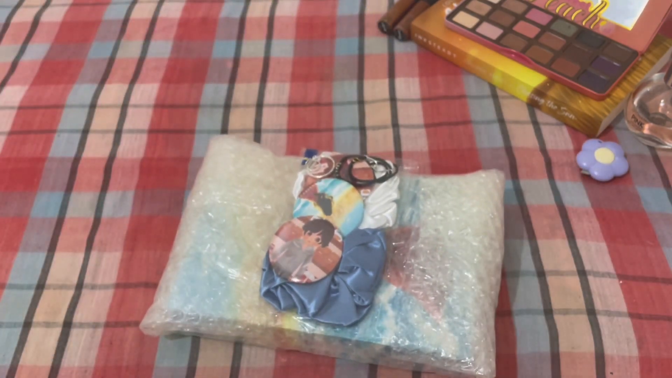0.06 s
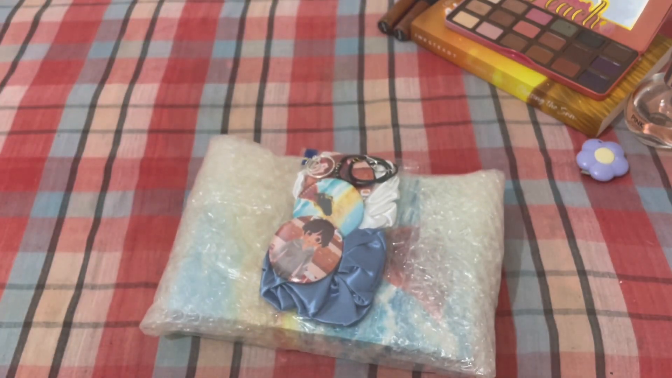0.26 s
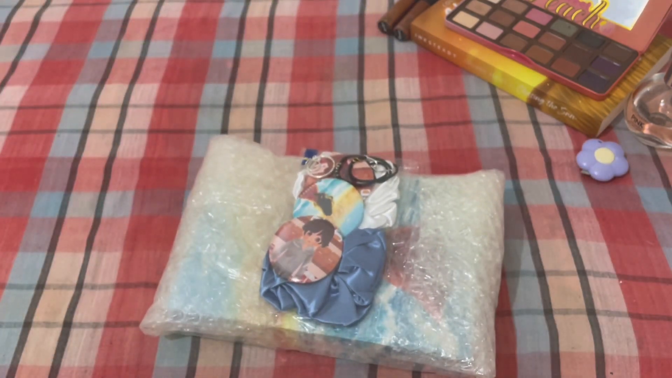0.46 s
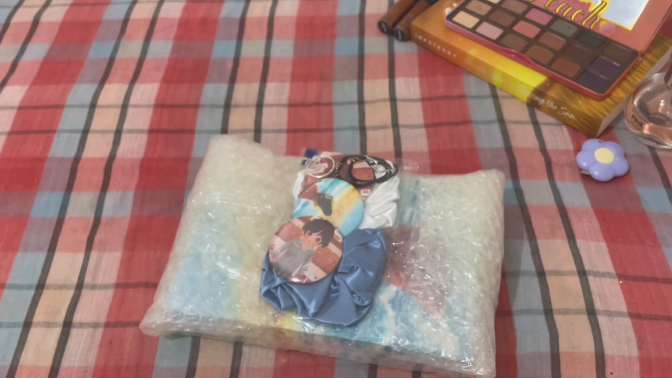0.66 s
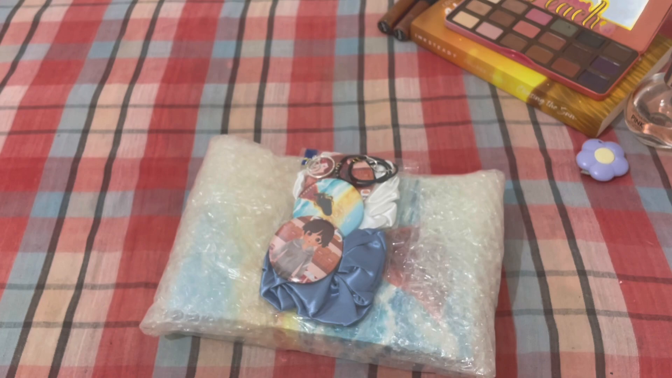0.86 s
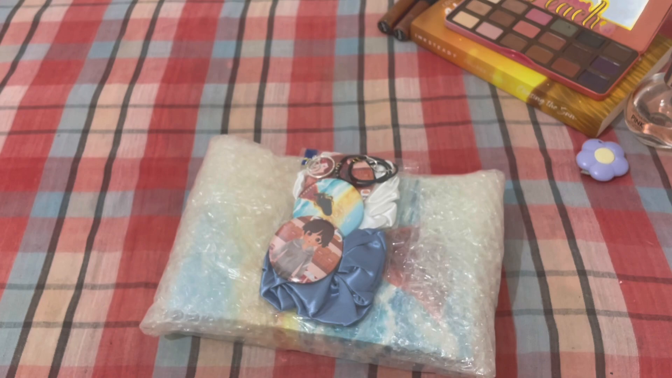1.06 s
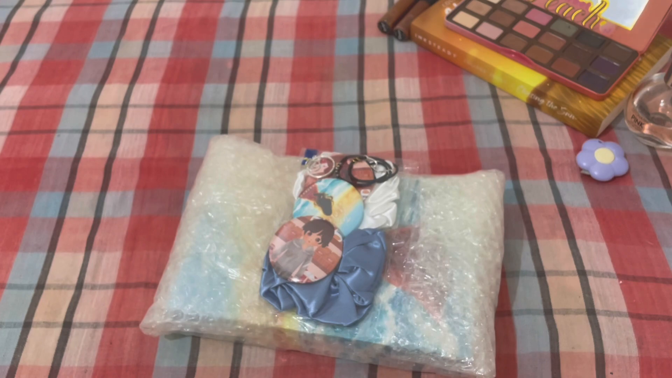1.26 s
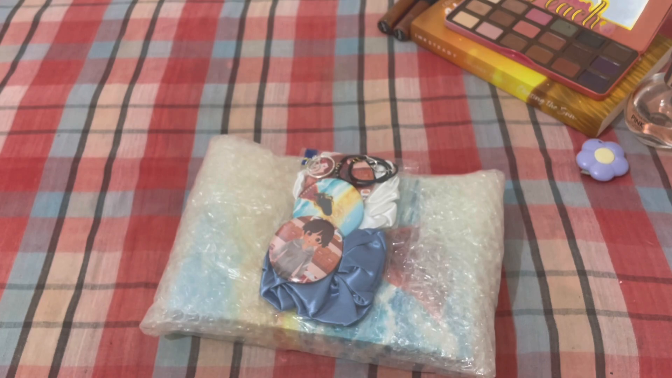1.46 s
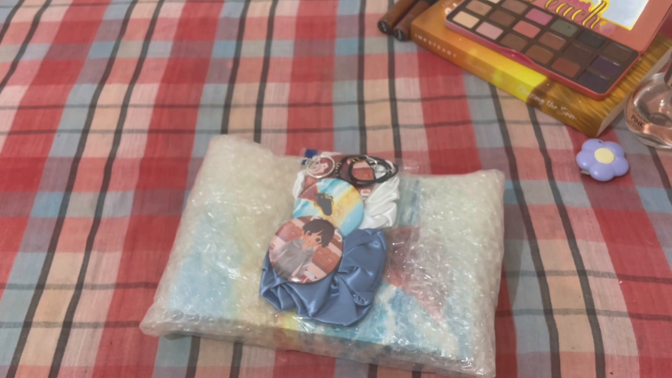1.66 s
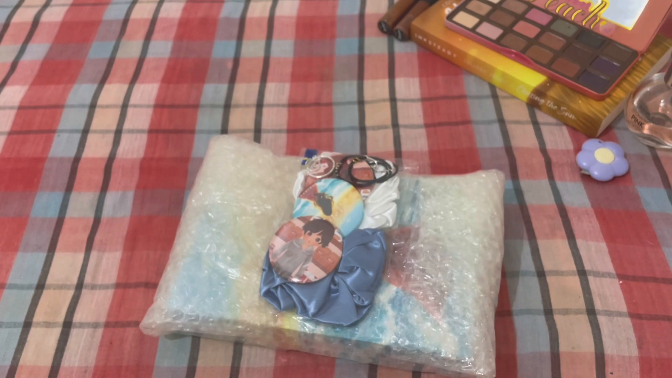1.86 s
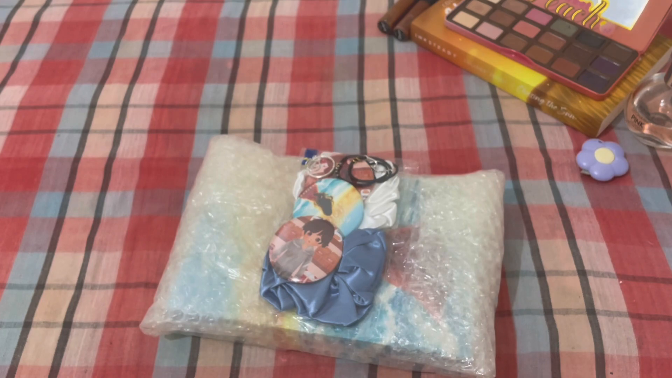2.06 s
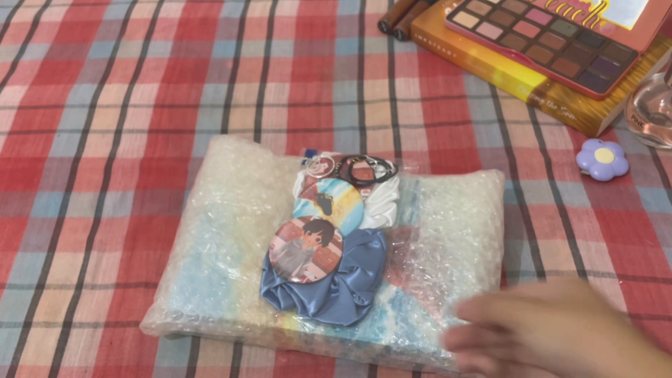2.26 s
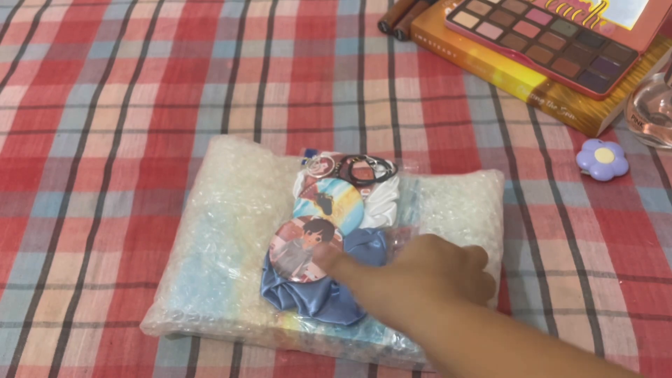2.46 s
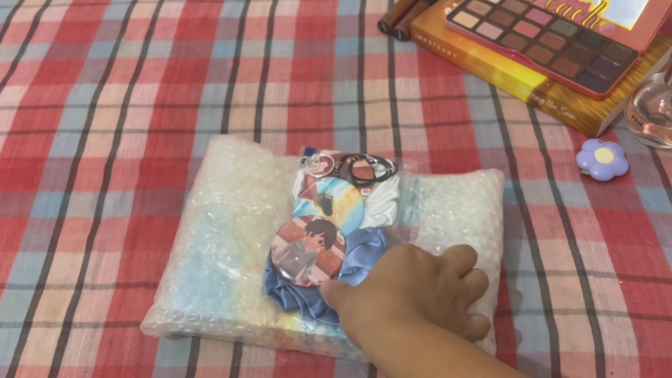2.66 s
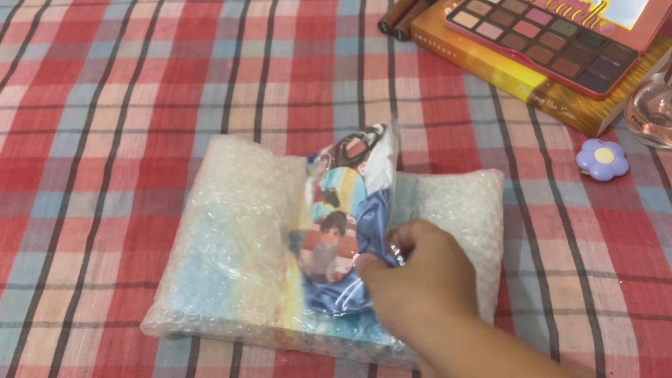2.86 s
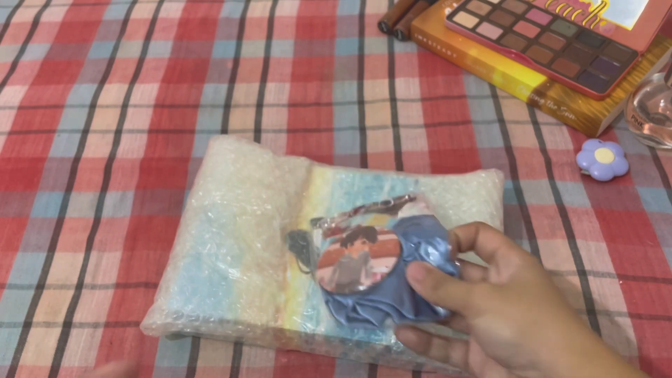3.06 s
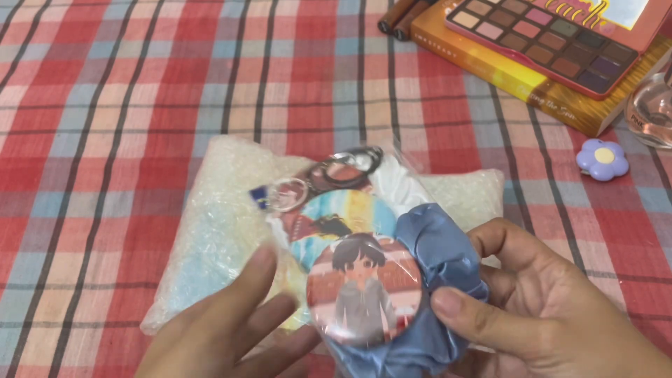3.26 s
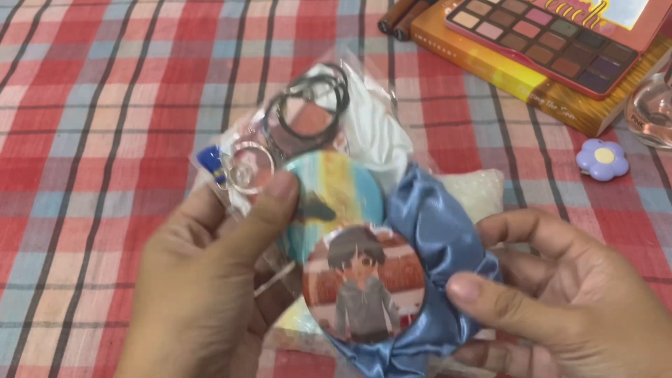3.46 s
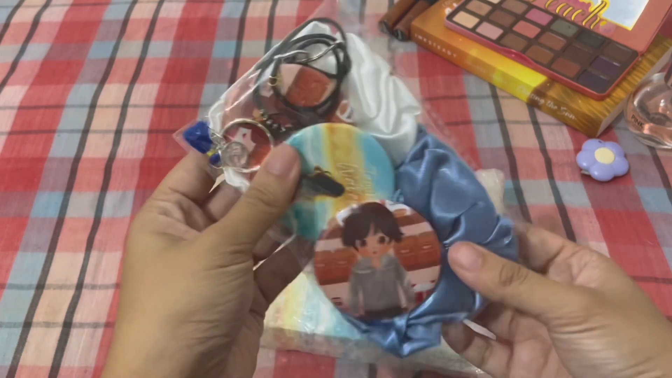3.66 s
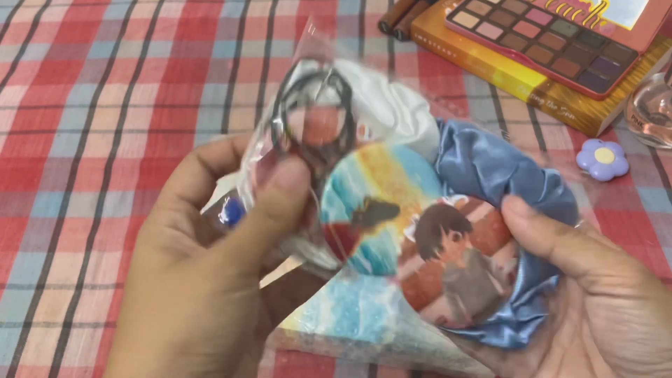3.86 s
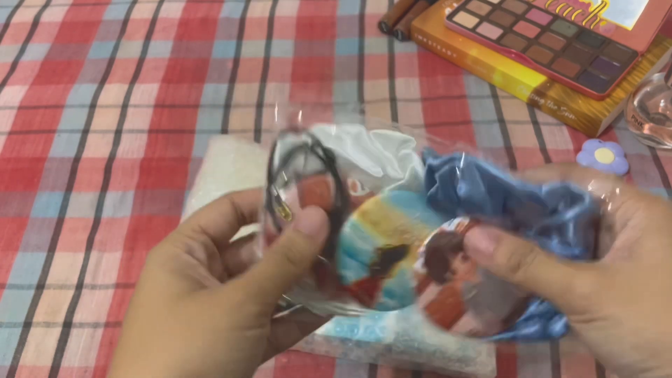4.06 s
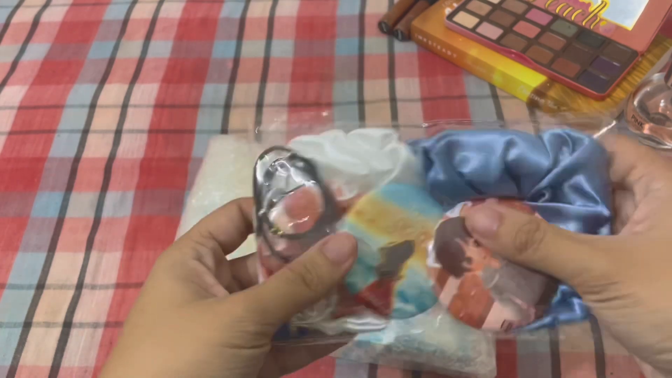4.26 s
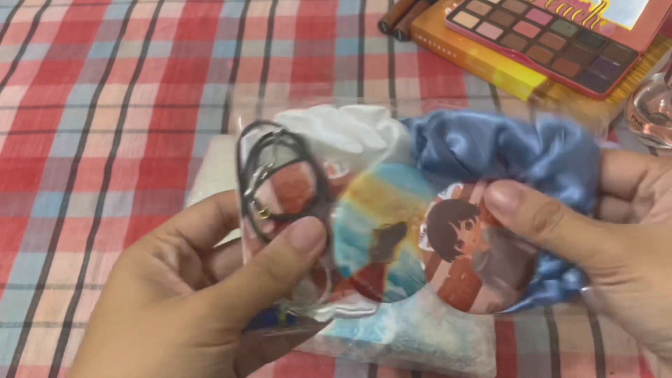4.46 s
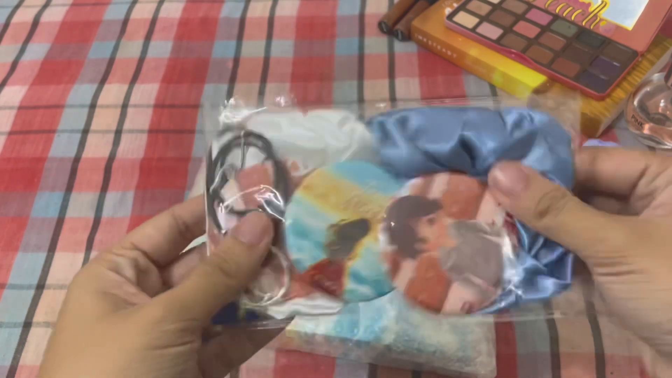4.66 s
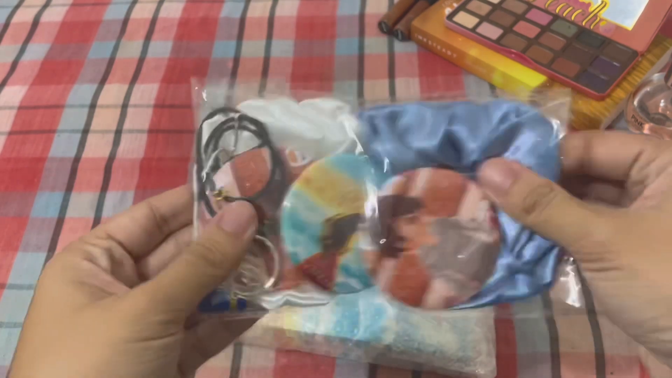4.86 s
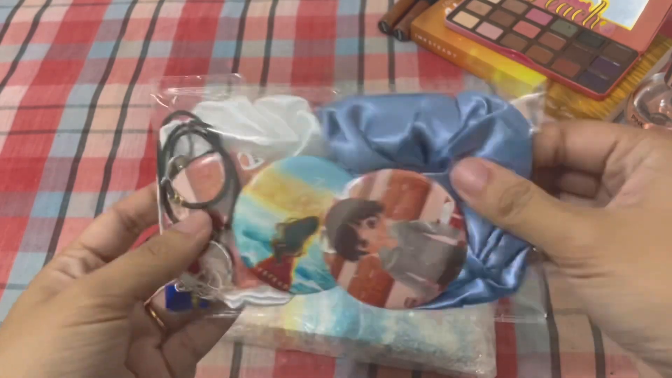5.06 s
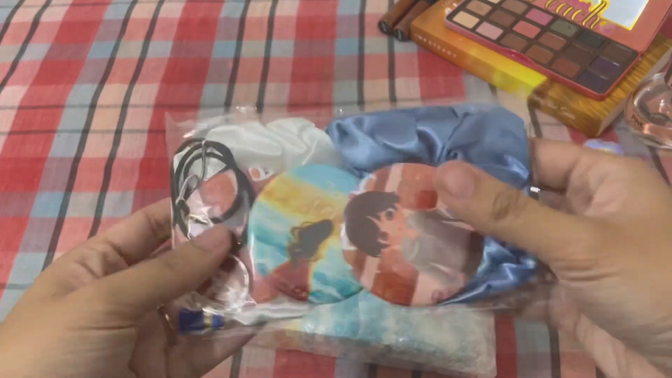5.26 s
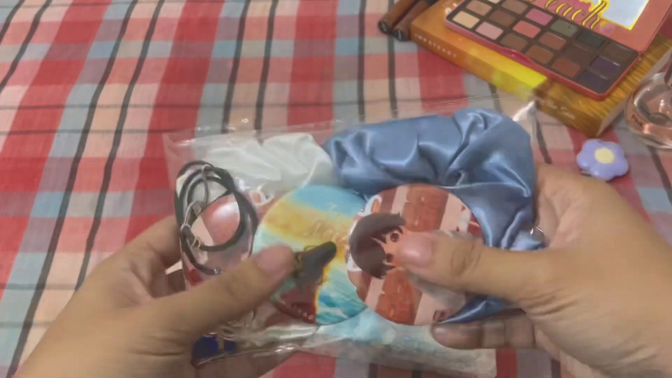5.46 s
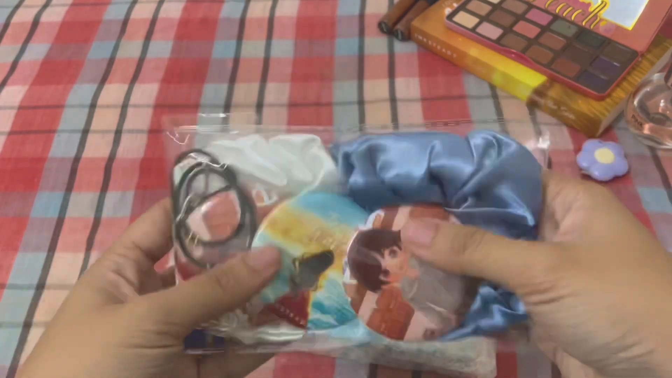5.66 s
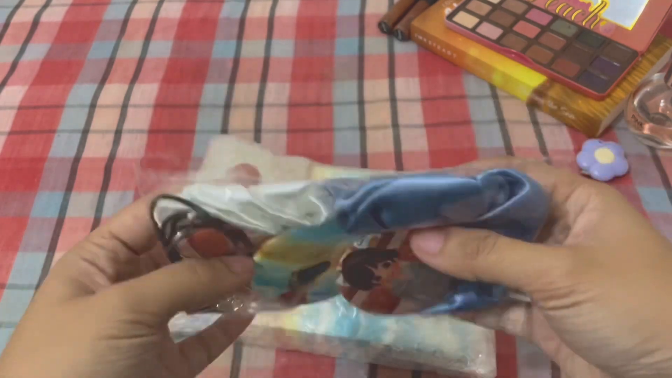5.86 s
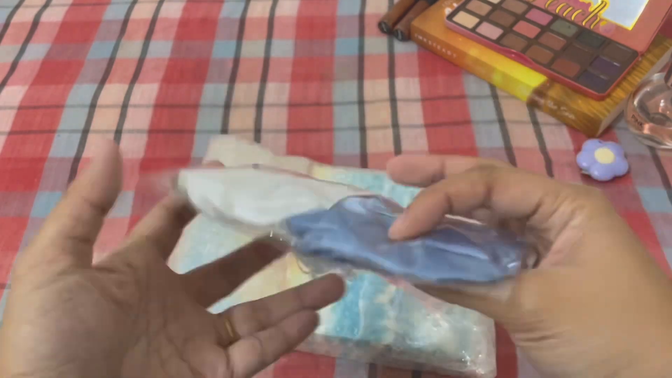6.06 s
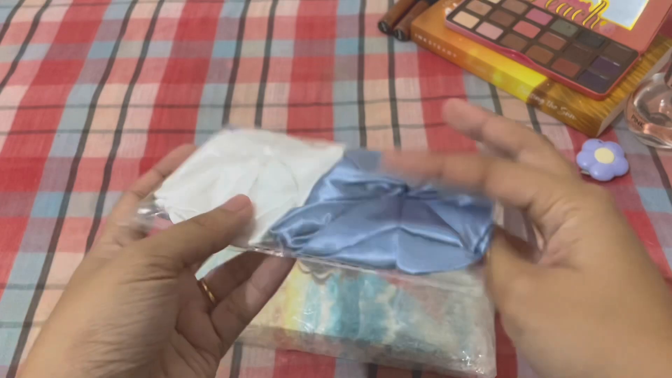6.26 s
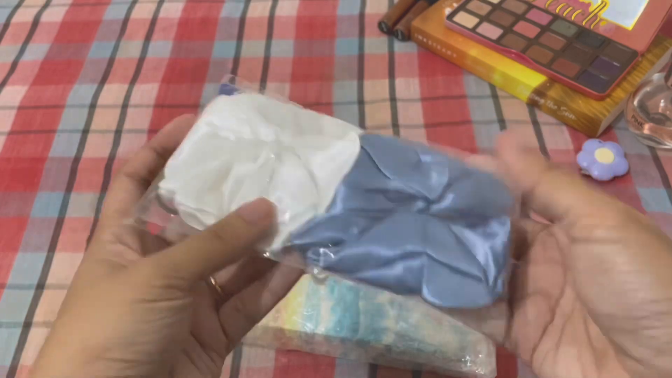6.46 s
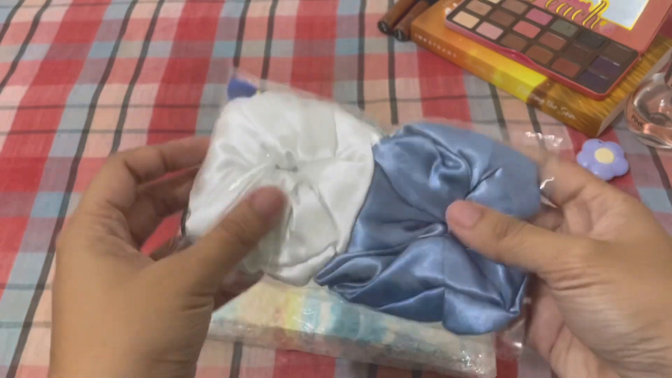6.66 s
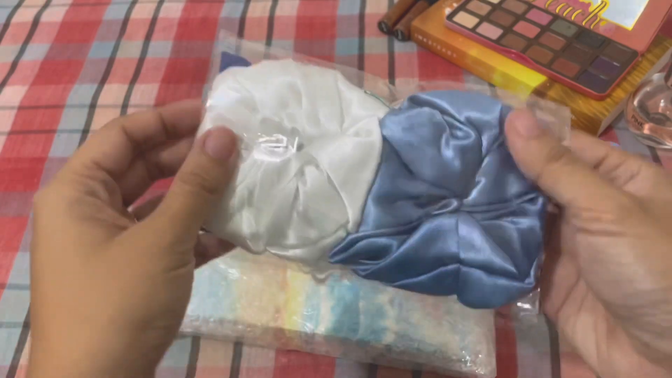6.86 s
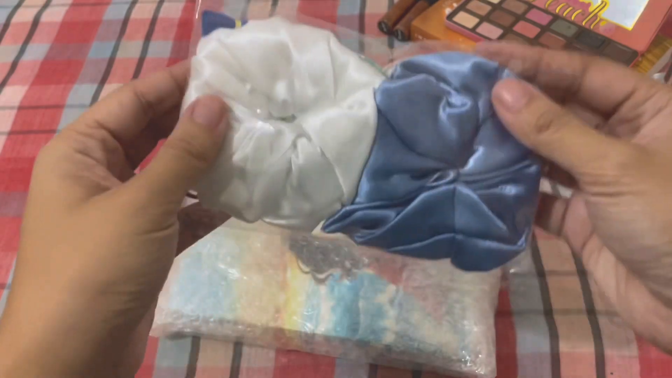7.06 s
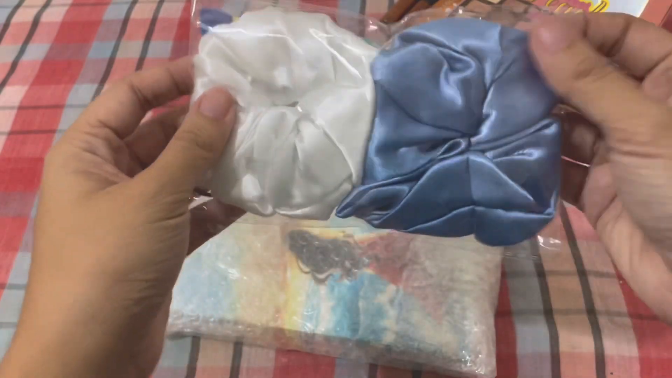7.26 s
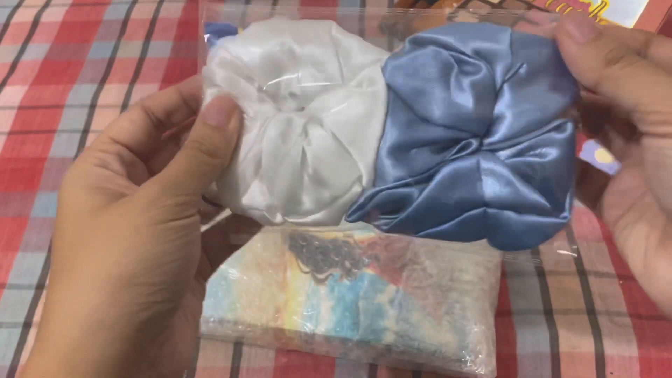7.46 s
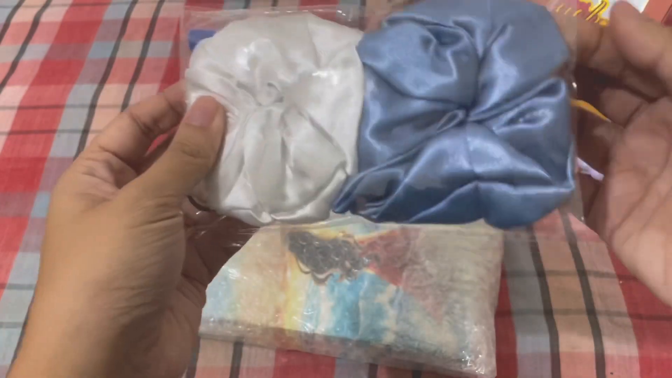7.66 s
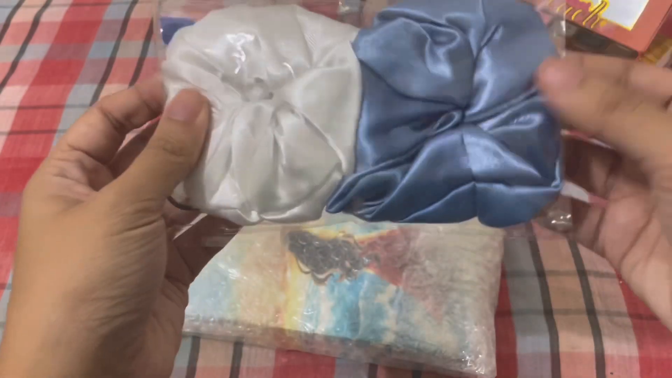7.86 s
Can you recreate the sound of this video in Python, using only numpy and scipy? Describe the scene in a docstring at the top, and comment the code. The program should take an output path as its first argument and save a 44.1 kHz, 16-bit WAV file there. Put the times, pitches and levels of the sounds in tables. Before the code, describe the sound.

Two dull table knocks and a faint rustle, then hands crinkle a clear plastic bag with sharp ticks, crackles and a late soft thump.

```python
"""A small room with a low rush of air: hands work a clear plastic bag over a cloth-covered table, close to a phone.
They pick the bag of hair ties and badges from a bubble-wrap parcel and turn it over, after a faint rustle.
Each flex sets off creases that tick and ring the panel beside them; folds cave in as runs of ringing panels.
The film slides and hisses as shaped noise. Dull knocks and bumps are decaying low modes with noise bursts;
a dragging arm is low rumble. Direct sound reaches two ports, and noise tails add the room."""
import sys
import numpy as np
from scipy import signal
from scipy.fft import rfft, irfft, next_fast_len
from scipy.io import wavfile

SR = 44100
rng = np.random.default_rng(int(sys.argv[2]) if len(sys.argv) > 2 else 0)


def master(y):
    """Save y as 16-bit WAV."""
    cut = np.clip(np.atleast_2d(y).T, -1, 1)
    pcm = np.round(cut * 32767)  # scale
    wavfile.write(sys.argv[1], SR, pcm.astype(np.int16))


N = 348831


def undb(db):
    """Decibels to amplitude gain."""
    return 10 ** (np.asarray(db) / 20)


def unit(x):
    """Scale each row to energy 1."""
    return x / np.sqrt(np.sum(x ** 2, axis=-1, keepdims=True))


def curve(rows):
    """Interpolate each table column over time; the first column is time_s."""
    time_s, *columns = np.transpose(rows)
    return [np.interp(np.arange(N) / SR, time_s, column) for column in columns]


def colour(x, points):
    """Minimum-phase filter through (hz, db) points: causal, so attacks stay sharp."""
    n = next_fast_len(x.shape[-1], True)
    n += n % 2
    hz, db = np.transpose(points)
    log_hz = np.log(np.fft.rfftfreq(n, 1 / SR) + 1)
    cepstrum = irfft(np.log(undb(np.interp(log_hz, np.log(hz), db))))
    # fold the cepstrum onto positive time
    cepstrum[1:n // 2] *= 2
    cepstrum[n // 2 + 1:] = 0
    response = np.exp(rfft(cepstrum))
    return irfft(rfft(x, n) * response)[..., :x.shape[-1]]


def noise(points):
    """Coloured noise of rms 1."""
    return unit(colour(rng.standard_normal(N), points)) * np.sqrt(N)


def walk(points_per_s):
    """Straight lines between random points: a wander of rms about 1.2."""
    return 1.48 * np.interp(np.arange(N) / SR * points_per_s, np.arange(N), rng.standard_normal(N))


def around(x, hz, ratio, order):
    """Band-pass from hz / ratio to hz * ratio."""
    band = signal.butter(order, [hz / ratio, hz * ratio], "band", fs=SR, output="sos")
    return signal.sosfilt(band, x)


def add(out, start_s, sound):
    """Mix a sound into a track at start_s."""
    i = max(int(start_s * SR), 0)
    out[..., i:i + sound.shape[-1]] += sound[..., :max(N - i, 0)]


def effort(rows, attack_s, release_s):
    """Strength of strokes (start_s, length_s, *level_db): each builds, holds and dies exponentially."""
    t = np.arange(N) / SR
    strength = 0
    for start_s, length_s, *level_db in rows:
        before = np.maximum(start_s - t, 0) / attack_s
        after = np.maximum(t - start_s - length_s, 0) / release_s
        stroke = np.exp(-np.minimum(before + after, 20))
        strength = np.maximum(strength, undb(level_db)[:, None] * stroke)
    return strength


# microphone ports, phase: hz, left_lead_rad
PORT_PHASE_POINTS = [(0, 0), (60, -.28), (200, -.42), (450, .4), (1000, .05), (2800, .35), (4000, .1),
                     (6000, -.1), (7000, -1.4), (8200, -3.1), (8900, -3.5), (10900, -5.8), (12400, -6.5),
                     (14300, -9.1), (16000, -9.6)]
# microphone ports, balance: hz, left_minus_right_db
PORT_BALANCE_POINTS = [(500, -1.5), (1400, 0), (2600, 2.5), (5000, 0.4), (7500, 0.5)]


def ports(x):
    """Direct sound reaches the two ports with frequency-dependent phase and level differences."""
    n = next_fast_len(N, True)
    hz = np.fft.rfftfreq(n, 1 / SR)
    balance_db = np.interp(hz, *np.transpose(PORT_BALANCE_POINTS))
    lead_rad = np.interp(hz, *np.transpose(PORT_PHASE_POINTS))
    half = undb(balance_db / 2) * np.exp(.5j * lead_rad)  # half of each difference per side
    return irfft(rfft(x, n) * np.array([half, 1 / half]), n)[:, :N]


def room(x, t60_s=.33, rise_s=0.00066, level_db=-9.5):
    """Short, dullish reverberation: a decaying noise tail of its own at each port."""
    t = np.arange(SR // 2) / SR
    shape = np.exp(-np.log(1000) * t / t60_s) * (1 - np.exp(-t / rise_s))
    tails = unit(rng.standard_normal((2, len(t))) * shape)
    tails = colour(tails, [(60, -14), (130, -6), (300, 3), (1500, 0), (5000, -2), (15000, -4)])
    return undb(level_db) * signal.fftconvolve(x, tails, axes=1)[:, :N]


# room air spectrum: hz, relative_db_per_hz
AIR_SPECTRUM = [(15, -61), (25, -9), (53, 1.5), (87, -1), (120, -0.5), (200, -11.5), (400, -12.5),
                (500, -11.5), (620, -13), (960, -14.5), (1400, -19.5), (1850, -19), (2150, -13),
                (2500, -18.5), (3400, -27), (7000, -35), (12500, -38), (16000, -63)]
# room air strength: time_s, level_db
AIR_LEVELS = [(0, -58), (.6, -57), (1.2, -54), (2.3, -54.5), (7.9, -55.5)]


def air(side_db=-8, side_hz=150):
    """Low rush of air: slowly drifting noise, with opposite-sign noise widening it above side_hz."""
    level_db, = curve(AIR_LEVELS)
    high_pass = signal.butter(1, side_hz, "high", fs=SR, output="sos")
    side = undb(side_db) * signal.sosfilt(high_pass, noise(AIR_SPECTRUM))
    return undb(level_db) * (ports(noise(AIR_SPECTRUM)) + np.array([side, -side]))


# faint rustle, mean strength: time_s, level_db
RUSTLE_LEVELS = [(1.09, -64), (1.145, -50.5), (1.3, -63), (1.48, -66), (1.545, -54), (1.6, -63),
                 (1.655, -53.5), (1.85, -84)]


def rustle(uneven_db=2, points_per_s=29.95):
    """A faint, dull rustle of movement: noise of wandering level."""
    level_db, = curve(RUSTLE_LEVELS)
    cloth = noise([(150, 11.5), (700, 5), (1600, -4.5), (5000, -17.5), (15000, -49)])
    return undb(level_db + uneven_db * walk(points_per_s)) * cloth


# arm dragging over the cloth: start_s, length_s, level_db
ARM_DRAGS = [(4.19, 0.23, -43), (7.01, 0.19, -29.5)]
# table rumble under the arm: hz, relative_db_per_hz
DRAG_SPECTRUM = [(30, -2), (60, 9), (100, -1), (200, -11.5), (320, -18), (500, -54), (1500, -69)]


def drags():
    """The table rumbles while an arm slides on it."""
    push, = effort(ARM_DRAGS, attack_s=0.02, release_s=0.051)
    return push * noise(DRAG_SPECTRUM)


# soft bumps of hands and arms: start_s, level_db (rms over 1/30 s), pitch_hz
SOFT_BUMPS = [(2.63, -49, 73.4), (3.236, -40.5, 92), (4.18, -49, 79), (4.206, -32, 95), (4.252, -35, 61),
              (4.36, -48, 104), (7.004, -32, 87), (7.086, -33, 162), (7.125, -29, 190),
              (7.129, -24.5, 77.5), (7.158, -40.5, 189), (7.204, -32, 61.6)]


def bumps(cycles=0.45, scuff_db=-7, scuff_s=0.018, width_ratio=1.46):
    """A soft push gives the table a heavily damped swing, with a dull scuff of cloth."""
    t = np.arange(SR // 4) / SR
    out = np.zeros(N)
    for start_s, level_db, pitch_hz in SOFT_BUMPS:
        cushion = 1 - np.exp(-2 * pitch_hz * t)
        swing = np.sin(2 * np.pi * pitch_hz * t) * np.exp(-pitch_hz * t / cycles) * cushion
        burst = rng.standard_normal(len(t)) * np.exp(-t / scuff_s)
        scuff = around(burst, 1.254 * pitch_hz, width_ratio, order=4)
        bump = unit(unit(swing) + undb(scuff_db) * unit(scuff))
        add(out, start_s, bump * undb(level_db))
    return out * np.sqrt(SR / 30)  # energy to rms over 1/30 s


# knocks: start_s, blow_db, blow_hz (band centre), rise_s (cushioning), heave_lag_s, heave_db
# (levels are rms over 1/30 s)
KNOCKS = [(0.663, -46, 450, 0.0044, 0.013, -39.5), (0.828, -30, 486, 0.0084, .02, -34.5),
          (.911, -26, 728, 0.0008, .011, -28), (3.225, -45.5, 212, 0.00085, 0.0076, -57)]
# table resonances: mode_hz, relative_db, t60_s
TABLE_MODES = [(61.5, 13.5, 0.49), (88, 22.5, 0.14), (120.2, 18, 0.25), (236, 11.5, 0.24), (288, 8.5, 0.15),
               (461.6, 1, 0.31), (571, -2.5, 0.28), (613, 13, 0.049), (644, -1.5, 0.34), (670, 12.5, 0.039),
               (800, -9.5, 0.33), (974, 6.5, 0.039), (2980, 13, 0.035)]


def table(rattle_db=-5.5, rattle_s=0.053, width_ratio=1.88, heave_hz=112):
    """Each knock rings the table and jostles what lies on it; the whole top heaves a moment later."""
    t = np.arange(SR // 2) / SR
    ring = 0
    for mode_hz, mode_db, t60_s in TABLE_MODES:
        ring = ring + undb(mode_db) * np.sin(2 * np.pi * mode_hz * t) * np.exp(-np.log(1000) * t / t60_s)
    ring = unit(ring)
    rattle_spectrum = [(30, -31.0), (80, 28.0), (750, 9.5), (1700, 7.5), (5000, 18), (15000, 15.5)]
    out = np.zeros(N)
    for start_s, blow_db, blow_hz, rise_s, lag_s, heave_db in KNOCKS:
        cushion = 1 - np.exp(-t / rise_s)
        blow, heave = (start_s, blow_db, blow_hz), (start_s + lag_s, heave_db, heave_hz)
        for when_s, level_db, centre_hz in (blow, heave):
            rattle = colour(rng.standard_normal(len(t)) * np.exp(-t / rattle_s), rattle_spectrum)
            struck = cushion * (ring + undb(rattle_db) * unit(rattle))
            knock = unit(around(struck, centre_hz, width_ratio, order=2))
            add(out, when_s, knock * undb(level_db))
    return out * np.sqrt(SR / 30)  # energy to rms over 1/30 s


def radiate(sounds, size=64):
    """Every fold faces another way: nearby film reflects it, colouring each sound and port differently."""
    fade = np.exp(-3 * np.arange(size) / size)
    shared = .65 * unit(rng.standard_normal((len(sounds), 1, size)) * fade ** 2)
    separate = .36 * unit(rng.standard_normal((len(sounds), 2, size)) * fade)
    paths = shared + separate
    paths[:, :, 0] += 1  # direct path
    return signal.fftconvolve(sounds[:, None], unit(paths), axes=2)


# crease tick, also film hiss: hz, relative_db_per_hz
TICK_SPECTRUM = [(100, -12), (480, -7), (820, -14), (1500, -7), (2900, -1), (4600, -1), (6600, 0),
                 (8000, -2), (10500, -3), (13500, -8), (16000, -10)]


def ticks(count, fast_s=0.00026, after_db=-20, crease_hz=6500, size=1024):
    """A crease flips in under a millisecond at its own pitch, trips a neighbour, and shivers briefly."""
    rise_s, neighbour_max_s, pitch_fade_s, slow_s = .00016, .004, .004, .004
    t = np.arange(size) / SR
    chance = rng.random((count, 3, 1))
    late_s = t - neighbour_max_s * chance[:, 0]
    neighbour = chance[:, 1] ** 2 * (late_s > 0) * np.exp(-np.abs(late_s) / fast_s)
    shiver = undb(after_db) * np.exp(-t / slow_s)
    shape = (1 - np.exp(-t / rise_s)) * (np.exp(-t / fast_s) + neighbour + shiver)
    pitch_hz = crease_hz * 2 ** (2 * chance[:, 2] - 1)
    pitch = np.sin(2 * np.pi * pitch_hz * t) * np.exp(-t / pitch_fade_s)
    return unit(colour((rng.standard_normal((count, size)) + .5 * pitch) * shape, TICK_SPECTRUM))


def panels(hz, cycles=2.0, spread=0.739, swell_cycles=1.0, count=12, size=1024):
    """A patch of film swells and rings for a few cycles, with new modes for every shape it takes."""
    long_share, long_cycles = .13, 17
    t = np.arange(size) / SR
    chance = rng.random((len(hz), count, 2, 1))
    ladder = 2 * (np.arange(count)[:, None] + chance[:, :, 0]) / count - 1  # -1 to 1, low to high mode
    turns = np.minimum(hz[:, None, None] * np.exp(spread * ladder), SR / 4) * t
    decay = np.exp(-turns / cycles) + long_share * np.exp(-turns / long_cycles)
    fade = (1 - np.exp(-turns / swell_cycles)) * decay
    weight = np.sign(chance[:, :, 1] - .5) * (1 - .5 * ladder ** 2)
    return unit(np.sum(weight * fade * np.sin(2 * np.pi * turns), axis=1))


# fingers first slide over the film: start_s, length_s, panel_relative_db, crease_relative_db
BRUSH_STROKES = [(2.435, 0.044, -60, -45.5)]
# bag stirring while merely held: time_s, relative_db
HOLD_LEVELS = [(2.39, -52), (2.56, -64), (2.66, -47), (3.08, -48), (3.17, -101), (3.38, -54), (3.7, -56.5),
               (4.1, -43.5), (4.8, -36.5), (4.95, -43), (5.04, -50), (5.085, -47), (5.13, -39), (5.24, -42),
               (5.3, -46), (5.37, -45), (5.9, -41.5), (6.3, -50), (6.44, -78), (6.6, -46.5), (7.4, -47.5),
               (7.5, -59), (7.7, -51.5), (7.9, -81)]
# fingers flexing the bag: start_s, length_s, panel_relative_db, crease_relative_db
FLEX_STROKES = [(2.6, 0.032, -41, -42), (2.755, 0.076, -46, -56), (2.835, 0.13, -43, -42.5),
                (2.99, 0.051, -46, -47.5), (3.402, 0.036, -31.5, -39), (3.447, 0.029, -33, -39),
                (3.513, 0.0066, -35, -36), (3.535, 0.02, -36.5, -40), (3.585, 0.045, -43, -60),
                (3.71, 0.16, -40.5, -46.5), (3.9, 0.031, -34.5, -48), (3.985, 0.23, -32.5, -34),
                (4.285, 0.026, -29, -29.5), (4.365, 0.049, -37.5, -31), (4.465, 0.047, -31.5, -29),
                (4.6, 0.029, -30, -32.5), (4.672, 0.058, -31, -30), (4.812, 0.016, -33, -32),
                (4.872, 0.052, -34.5, -30), (4.988, 0.05, -36.5, -33.5), (5.185, 0.038, -36.5, -32.5),
                (5.332, 0.064, -34.5, -36), (5.4, 0.1, -34, -36.5), (5.53, 0.051, -32, -40.5),
                (5.64, 0.17, -34.5, -40), (5.835, 0.07, -30, -30.5), (5.985, 0.095, -42.5, -39),
                (6.19, 0.051, -44, -57), (6.28, 0.088, -42, -44), (6.53, 0.076, -35, -43),
                (6.6, 0.066, -39, -49), (6.8, 0.11, -39.5, -41), (7.015, 0.08, -43.5, -42.5),
                (7.31, 0.12, -42.5, -48), (7.63, 0.031, -46.5, -36)]


def handling(catch_db=-0.8, catch_points_per_s=70):
    """Broad-panel and fine-crease strength as fingers first brush, then hold and flex film that catches."""
    hold_db, = curve(HOLD_LEVELS)
    held = undb(hold_db) * (np.arange(N) / SR > HOLD_LEVELS[0][0])
    flexed = effort(FLEX_STROKES, attack_s=0.0072, release_s=0.011)
    catching = undb(catch_db * np.tanh(walk(catch_points_per_s)))
    brushed = effort(BRUSH_STROKES, attack_s=0.021, release_s=0.074)
    return np.hypot(flexed, held) * catching, brushed


# sliding film: hz, relative_db_per_hz
RUB_SPECTRUM = [(60, -7), (150, -0.5), (340, -2), (460, 3.5), (600, -1), (780, -6.5), (1200, -5),
                (2500, -1), (4000, -8.5), (7000, -14.5), (16000, -35)]


def sliding(worked, brushed, uneven_db=3, slip_db=-10.0, hiss_db=-3.0):
    """Film slides with an uneven rub and hiss; brushing fingers add a swish."""
    rub, hiss = worked * undb(slip_db + uneven_db * walk(140)) + brushed
    slide = rub * noise(RUB_SPECTRUM) + hiss * undb(hiss_db) * noise(TICK_SPECTRUM)
    swish_spectrum = [(1000, -9), (2300, -1.5), (3000, 0), (3900, 1.5), (4800, -10), (12000, -22)]
    return slide + brushed[1] * noise(swish_spectrum)


def crackle(panel, crease, panel_hz=2100, ring_db=-11.0, tick_db=-2, count=160):
    """Many small random buckles, most of them tiny, as strong as the film is worked."""
    buckles_per_s, scatter_db, bright_range_db = 520, 7.8, 5
    ring_hz = panel_hz * np.exp(0.3045 * rng.standard_normal(count))
    rings = radiate(panels(ring_hz, cycles=2.0, spread=0.617, count=5))
    cracks = radiate(ticks(count))
    chance = rng.random((int(buckles_per_s * N / SR), 4))
    size_db = scatter_db * np.minimum(-np.log(chance[:, 1]), 2.2)
    bright_db = bright_range_db * (2 * chance[:, 2] - 1)
    ring_gain = unit(undb(size_db - bright_db)) * np.sqrt(N)
    tick_gain = unit(undb(size_db + bright_db)) * np.sqrt(N)
    low, high = np.zeros((2, 2, N))
    for (place, _, _, shape), ring, tick in zip(chance, ring_gain, tick_gain):
        when_s = place * N / SR
        add(low, when_s, ring * rings[int(shape * count)])
        add(high, when_s, tick * cracks[int(shape * count)])
    return low * panel * undb(ring_db) + high * crease * undb(tick_db)


# folds caving in: middle_s, length_s, level_db (rms over the length), panel_hz
FOLDS = [(2.884, 0.03, -44.5, 2260), (2.947, 0.019, -43, 1880), (3.011, 0.013, -41, 1675),
         (3.43, 0.0038, -39, 1810), (3.45, 0.012, -26, 2160), (4.203, 0.017, -26, 1904),
         (4.307, 0.0074, -30, 1543), (4.371, 0.018, -27.5, 2060), (4.392, 0.023, -40, 2070),
         (4.406, 0.013, -31.5, 3000), (4.494, 0.013, -31, 2015), (4.609, 0.016, -30, 1770),
         (4.69, 0.022, -49, 1970), (4.705, 0.006, -26.5, 1505), (4.819, 0.014, -34, 1820),
         (4.895, 0.011, -32, 2100), (4.916, 0.0085, -40, 1700), (5.022, .026, -39, 1860),
         (5.222, 0.03, -42, 2580), (5.41, 0.024, -37, 2700), (5.433, 0.018, -30, 2200),
         (5.485, 0.014, -35.5, 2620), (5.559, 0.013, -33, 2070), (5.854, 0.04, -47, 2230)]


def crumples(spread=0.606, cycles=2.8, edge_db=-9, count=9):
    """A fold caves in: panels of differing pitch topple one after another, hardest in mid-run."""
    out = np.zeros((2, N))
    for middle_s, length_s, level_db, panel_hz in FOLDS:
        place = (np.arange(count) + rng.random(count)) / count - .5
        share = unit(undb(edge_db * np.abs(2 * place)))
        gains = share * undb(level_db) * np.sqrt(length_s * SR)
        ring_hz = panel_hz * np.exp(0.1765 * rng.standard_normal(count))
        rings = radiate(panels(ring_hz, cycles=cycles, spread=spread, count=6))
        for when_s, gain, ring in zip(middle_s + length_s * place, gains, rings):
            add(out, when_s, gain * ring)
    return out


# loudest creases buckling: start_s, panel_ring_db, tick_db (levels are rms over 10 ms)
LOUD_BUCKLES = [(1.2814, -56, -58), (2.5513, -38.5, -38.5), (2.599, -46, -43), (2.634, -61, -38.5),
                (2.667, -46.5, -44), (2.7282, -45, -35), (2.757, -58, -38.5), (2.7995, -48, -41),
                (2.9, -41, -44), (3.077, -43, -33.5), (3.112, -55, -47), (3.199, -49, -40.5),
                (3.4082, -36, -36), (3.4446, -27, -37), (3.465, -49, -31.5), (3.493, -33, -34),
                (3.5382, -35, -28.5), (3.605, -52, -39.5), (3.7388, -54, -36), (3.791, -65, -36),
                (3.881, -48, -37), (3.912, -41, -34), (3.923, -35, -40), (3.9564, -34.5, -31.5),
                (3.966, -37, -31.5), (4.013, -34, -35), (4.068, -41, -48), (4.202, -34, -35),
                (4.303, -22.5, -29.5), (4.368, -26, -47), (4.478, -43, -42), (4.4941, -27.5, -35),
                (4.512, -40, -33), (4.5253, -49, -34.5), (4.563, -52, -36.5), (4.61, -30.5, -36),
                (4.624, -44, -33), (4.6503, -45, -33), (4.7049, -25.5, -26.5), (4.729, -40, -33),
                (4.771, -44, -34.5), (4.814, -29, -29.5), (4.8417, -37.5, -26.5), (4.8624, -33.5, -29.5),
                (4.892, -37, -42), (4.9177, -30, -35), (4.985, -45, -35.5), (5.0303, -48, -36),
                (5.059, -55, -40.5), (5.1186, -34, -40), (5.169, -50, -39), (5.2169, -57, -35),
                (5.226, -41, -34), (5.272, -36.5, -42.5), (5.311, -56, -36.5), (5.335, -38, -33.5),
                (5.345, -44, -32), (5.36, -44, -36), (5.421, -38, -36), (5.4332, -37, -34),
                (5.487, -40, -39), (5.559, -33, -42), (5.569, -34, -33.5), (5.642, -39.5, -32.5),
                (5.681, -56, -35), (5.702, -45, -32.5), (5.768, -38.5, -57), (5.7913, -43, -33),
                (5.869, -48, -29.5), (5.874, -54, -31), (5.899, -43, -41), (5.929, -53, -33),
                (6.012, -38.5, -33), (6.0564, -46, -34.5), (6.0735, -39.5, -28), (6.0832, -34.5, -34),
                (6.092, -44, -39), (6.1873, -40.5, -33), (6.294, -43, -37), (6.316, -52, -37),
                (6.363, -47, -36), (6.487, -62, -40), (6.5245, -38, -41), (6.674, -49, -34),
                (6.742, -44.5, -41), (6.776, -45, -50), (6.805, -44.5, -35.5), (6.865, -47, -35.5),
                (6.89, -50, -38), (7.017, -57, -36.5), (7.102, -45, -36.5), (7.144, -49, -31.5),
                (7.159, -38.5, -59), (7.1791, -37, -28.5), (7.2668, -41.5, -39), (7.278, -43.5, -42),
                (7.318, -43, -39), (7.353, -54, -39), (7.402, -46, -32.5), (7.4251, -46, -33),
                (7.455, -47.5, -42.5), (7.604, -62, -36.5), (7.677, -38.5, -40.5), (7.691, -44, -42),
                (7.8039, -50.5, -45), (7.876, -57, -42.5)]


def snaps(lead_db=-15, lead_s=0.0039, panel_hz=2750, db_per_octave=46, scatter_octaves=0.1134):
    """A crease gives a little, then flips with a tick and rings its panel; louder panels ring lower."""
    start_s, ring_db, tick_db = np.transpose(LOUD_BUCKLES)
    octaves = (np.median(ring_db) - ring_db) / db_per_octave
    ring_hz = panel_hz * 2 ** (octaves + scatter_octaves * rng.standard_normal(len(start_s)))
    ring, tick = undb(ring_db)[:, None], undb(tick_db)[:, None]
    flip = ring * panels(ring_hz, swell_cycles=0.29)
    flip = flip + tick * ticks(len(start_s), fast_s=0.00028, after_db=-15.5)
    lead = tick * undb(lead_db) * ticks(len(start_s))
    out = np.zeros((2, N))
    for when_s, give, buckle in zip(start_s, radiate(lead), radiate(flip)):
        add(out, when_s - lead_s * (.5 + rng.random()), give)
        add(out, when_s, buckle)
    return out * np.sqrt(SR / 100)  # energy to rms over 10 ms


def bag(brush_crackle_db=-9):
    """Brushed, held and flexed film: sliding hiss and crackle under caving folds and loud buckles."""
    worked, brushed = handling()
    panel, crease = worked + undb(brush_crackle_db) * brushed
    return sliding(worked, brushed) + crackle(panel, crease) + crumples() + snaps()


def scene(knock_room_db=-4):
    """Bag and table, direct and through the room; knocks excite the room less."""
    near = rustle() + drags() + bumps() + bag()
    knocks = table()
    return air() + room(near + undb(knock_room_db) * knocks) + ports(near + knocks)


def record(dry):
    """The phone cuts the deepest rumble below 36 Hz and the top above 16 kHz."""
    dry = signal.sosfilt(signal.butter(4, 36, "high", fs=SR, output="sos"), dry)
    return signal.sosfilt(signal.ellip(8, .2, 70, 16000, fs=SR, output="sos"), dry)


dry = scene()
out = record(dry)
master(out)
```